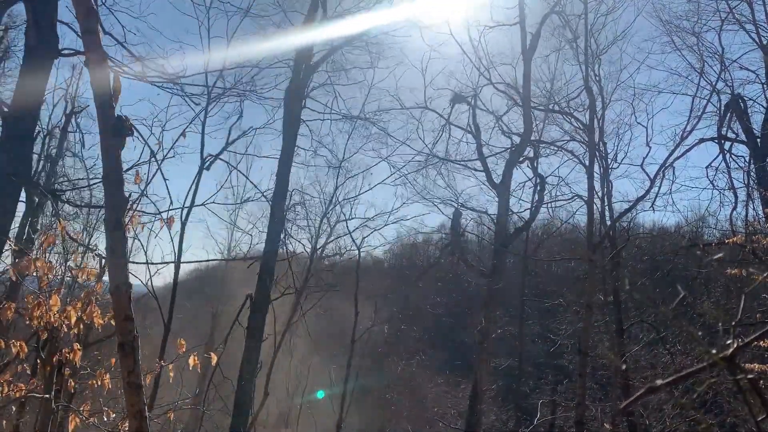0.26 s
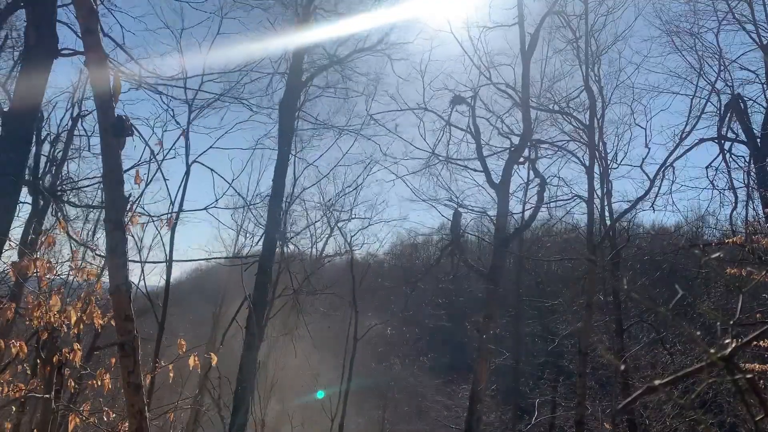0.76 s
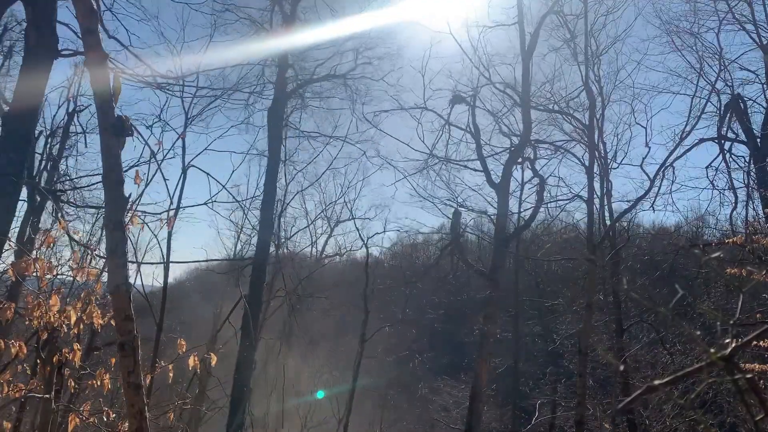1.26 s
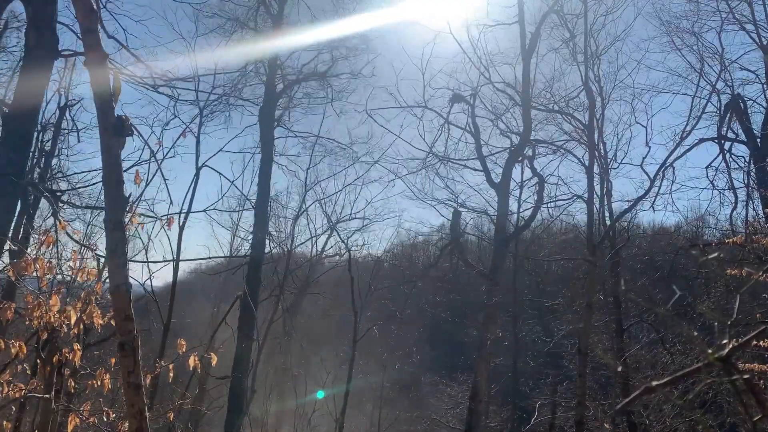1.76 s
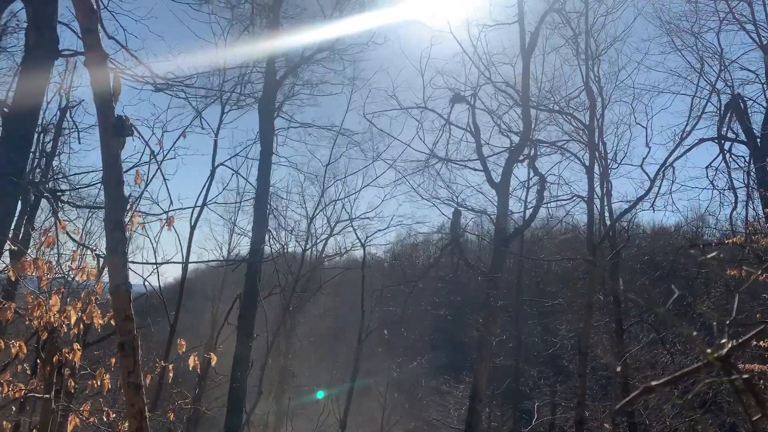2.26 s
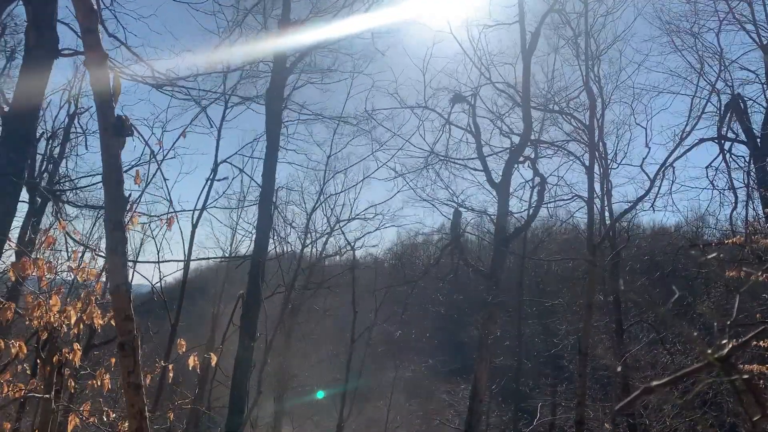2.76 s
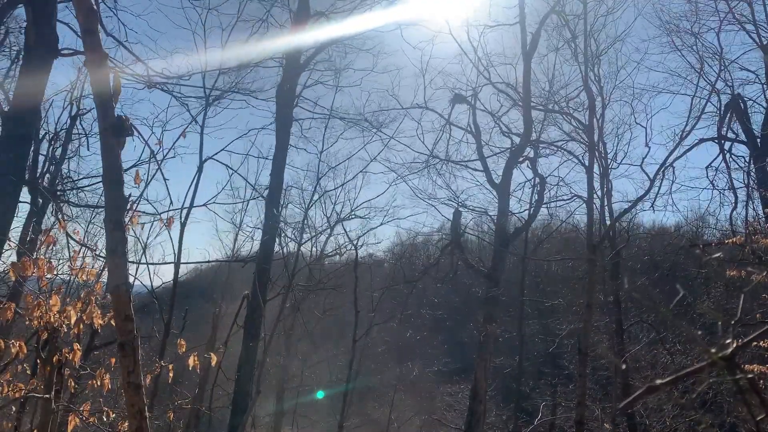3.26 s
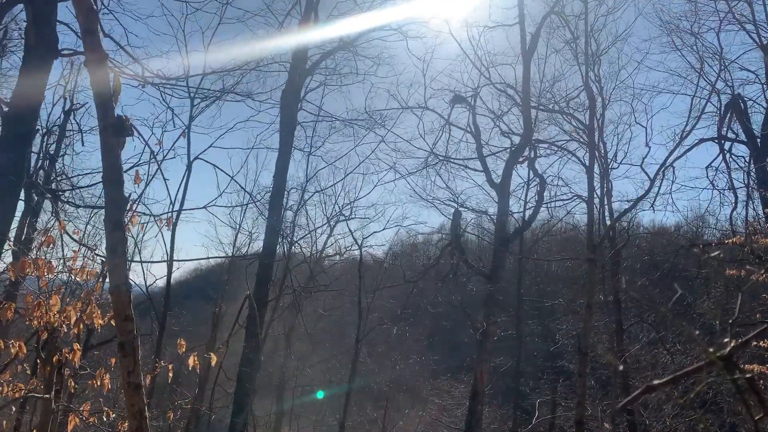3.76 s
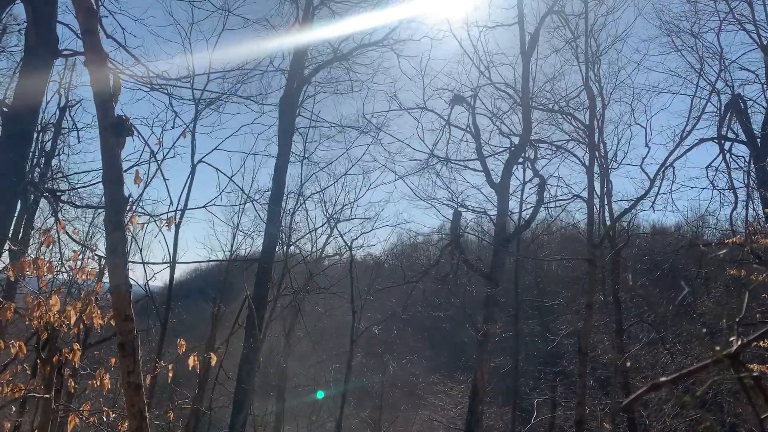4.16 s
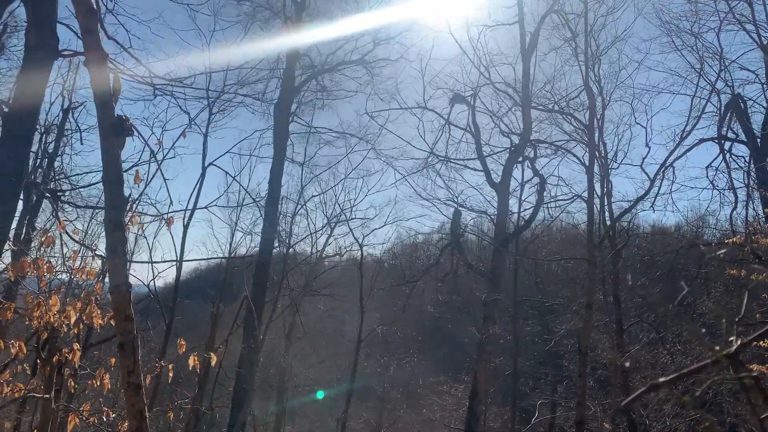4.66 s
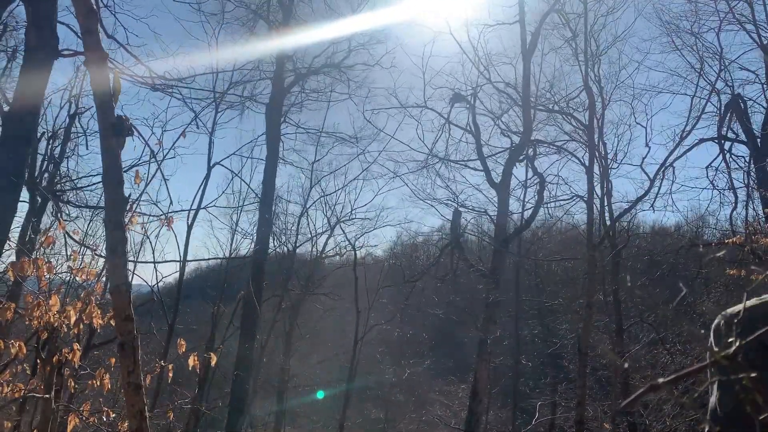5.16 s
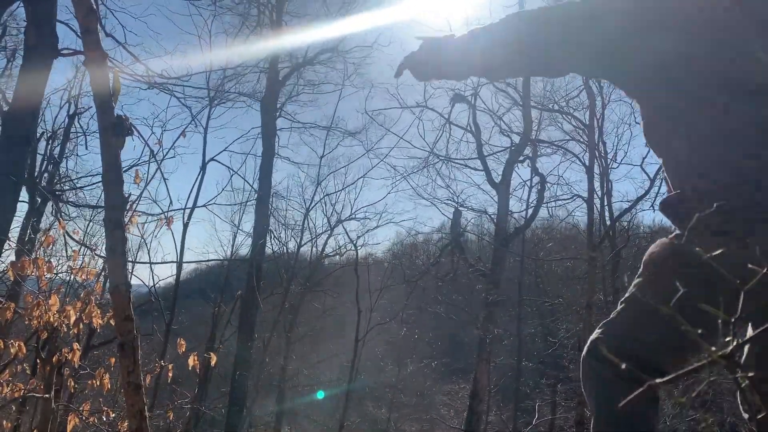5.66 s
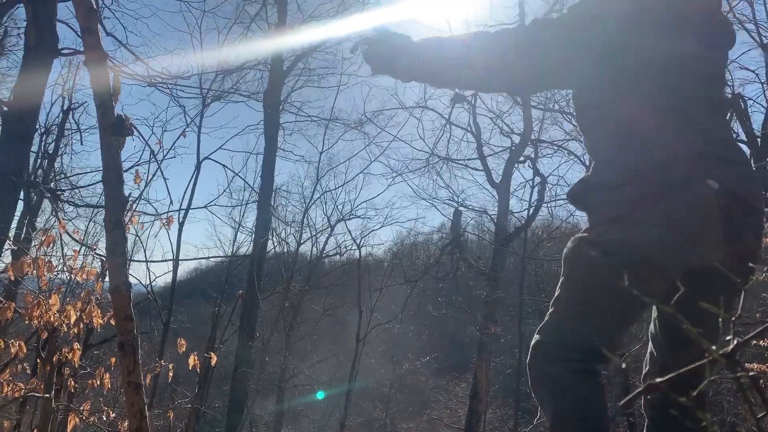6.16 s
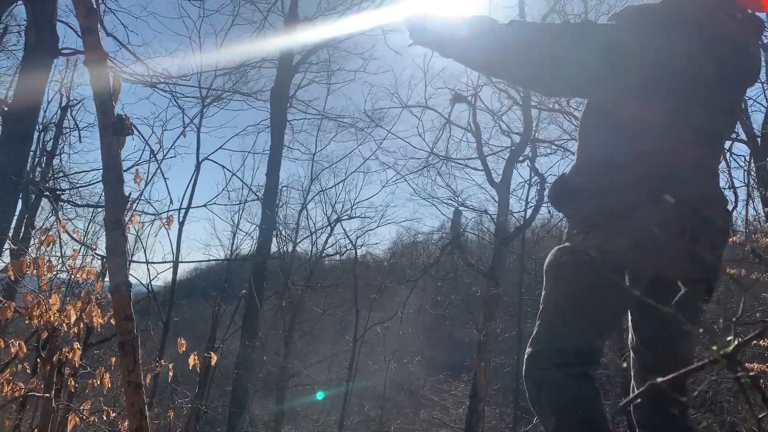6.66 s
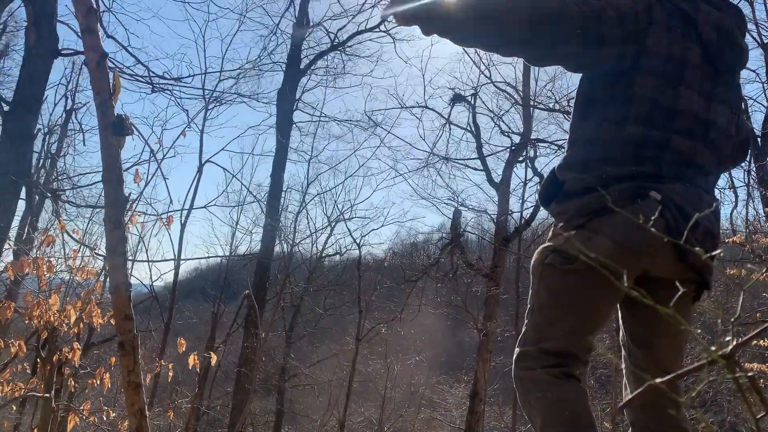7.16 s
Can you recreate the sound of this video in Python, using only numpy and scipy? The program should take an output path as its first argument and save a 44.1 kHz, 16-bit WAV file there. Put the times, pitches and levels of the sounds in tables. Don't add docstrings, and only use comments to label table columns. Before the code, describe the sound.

Branches crack and a trunk lands with deep thumps, twigs rain down, then boots crunch leaves and kick a hollow log as an engine idles.

```python
import sys
import numpy as np
from scipy import signal
from scipy.fft import rfft, irfft, next_fast_len
from scipy.io import wavfile
from scipy.ndimage import uniform_filter1d, map_coordinates

SR = 44100
rng = np.random.default_rng(int(sys.argv[2]) if len(sys.argv) > 2 else 0)


def dump_mix(stems):
    frames = np.atleast_2d(stems).T
    limited = np.clip(frames, -1, 1)
    pcm = np.round(limited * 32767).astype(np.int16)
    wavfile.write(sys.argv[1], SR, pcm)


def field_ratio(decibels):
    return 10 ** (np.asarray(decibels, dtype=float) / 20)


N = 327222
ASIDE = 20.1

# time in seconds, level in dB.
IDLE_LEVEL = [(0.0, -42.5), (0.6, -42), (1.07, -40), (2.44, -39), (4.17, -37.5), (5.37, -35), (6.8, -35),
              (7.42, -35)]
# order, level in dB, polarity.
SHAFT_ORDERS = [(2, -9.5, 0.54), (3, -1, 1), (4, -1, 1), (5, -9, -0.79), (6, -17, -0.89), (7, -14, 0.78)]
# frequency in Hz, density in dB per Hz.
EXHAUST_SPECTRUM = [(25, -25), (45, 1.5), (110, 2), (200, -6.5), (320, -18), (520, -9.5), (900, -21),
                    (1900, -16), (2600, -21), (3500, -32), (8000, -41), (15000, -71.5)]
# frequency in Hz, t60 in seconds.
TREE_DECAY = [(200, 0.34), (2000, 0.26), (10000, 0.016)]

# start in seconds, hold in seconds, level in dB.
SHAKES = [(0.05, 0.072, -39), (0.184, 0.11, -41), (0.401, 0.2, -32.5), (0.713, 0.047, -38),
          (0.853, 0.076, -41.5), (0.993, 0.074, -42.5), (1.213, .06, -46.5), (1.44, 0.0082, -45),
          (3.085, 0.0081, -31), (3.157, 0.07, -32), (3.344, 0.035, -48.5), (3.708, .01, -34.5),
          (3.907, .02, -45), (4.096, 0.31, -45.5)]
# frequency in Hz, width in Hz, level in dB.
SOIL_MODES = [(134, 68, 1.5), (181, 18, -3), (226, 20, -12)]
# start in seconds, peak in dB, frequency in Hz, t60 in seconds.
THUDS = [
    (0.038, -24, 106, 0.07),
    (0.411, -24, 152, 0.069),
    (0.484, -26, 127, 0.056),
    (0.528, -18.5, 127, 0.16),
    (0.564, -19, 131, 0.093),
    (0.961, -31, 180, 0.083),
    (3.082, -35, 101, 0.03),
    (3.175, -22, 140, 0.059),
    (3.198, -29, 182, 0.057),
    (3.219, -20, 110, 0.038),
]

# start in seconds, hold in seconds, leaves in dB, soil in dB.
STRIDES = [(3.155, 0.062, -72, -45), (3.404, 0.31, -39.5, -43.5), (3.892, 0.06, -40, -40),
           (4.116, 0.12, -41, -42.5), (4.348, 0.044, -45, -44.5), (4.561, 0.07, -45.5, -41.5),
           (4.727, 0.061, -48, -45), (4.883, 0.062, -38.5, -40.5), (5.306, 0.018, -49, -44),
           (5.535, 0.04, -47.5, -47), (5.775, 0.073, -53, -57), (5.99, .05, -53, -46.5),
           (6.323, 0.17, -59.5, -55), (6.665, 0.032, -61, -61), (6.844, 0.019, -64.5, -66),
           (7.04, .03, -72, -62), (7.337, .1, -60.5, -48.5)]
# time in seconds, delay at the left port in samples.
PATH = [(4.15, 20), (4.5, 18), (5.7, 17.5), (6.1, 20)]
# time in seconds, share 0-1.
FACING = [(4.0, 0.1), (4.2, 0.6), (5.9, 0.8), (6.2, 0.7)]
# frequency in Hz, gain in dB.
SIDE_SHADE = [(7200, 0), (8600, -2), (9600, -7), (10800, 1)]
# frequency in Hz, density in dB per Hz.
DAMP_SPECTRUM = [(500, -15), (1000, -2), (2000, 4.5), (4200, 5), (5300, 1.5), (7000, 1.5), (9000, 8),
                 (10500, -2.5), (12500, -39)]
# frequency in Hz, density in dB per Hz.
CRISP_SPECTRUM = [(6000, -52), (8500, 9), (10000, 4), (11500, 0), (13500, 4.5), (15500, 4)]
# frequency in Hz, density in dB per Hz.
SCUFF_SPECTRUM = [(120, -32), (250, 1.5), (550, -3.5), (800, -9), (1500, -21)]

# start in seconds, peak in dB, note in Hz, splinters in dB, splinters in Hz.
CRACKS = [(0.116, -19, 1990, -17, 7650), (0.3243, -28, 1570, -20, 6820), (0.3493, -16.5, 1460, -30, 7450),
          (0.3676, -14, 1520, -17, 7180), (0.384, -39, 1650, -18, 4400), (0.392, -24, 1780, -9, 6450),
          (1.548, -27.5, 1290, -9, 3200), (1.835, -27.5, 1900, -11, 4160), (1.856, -32, 1700, -6, 6700),
          (2.944, -51, 1880, 10.5, 6260), (3.095, -31.5, 1690, -12, 3500), (6.585, -37, 1090, -16, 5850)]
# start in seconds, peak in dB, note in Hz,
# splinters in dB, splinters in Hz.
KNOCKS = [
    (0.508, -31, 1480, -18, 7630),
    (0.583, -38, 1010, -14, 8130),
    (0.81, -29.5, 1810, -3, 7290),
    (1.549, -30, 2110, -16, 4050),
    (1.934, -35.5, 1670, -11, 12300),
]
# start in seconds, peak in dB, note in Hz, splinters in dB, splinters in Hz.
SNAPS = [(3.2304, -35.5, 2380, 1.5, 4110), (3.6364, -27, 2840, -26, 4380), (3.8134, -31, 2190, 0.5, 4300),
         (3.8824, -31, 2170, -10, 4330), (3.9265, -21.5, 2200, -5.5, 4040), (4.1814, -35, 2180, 6, 14600),
         (4.1843, -24, 2430, -4, 12700), (4.1866, -18, 3170, -9.5, 7620), (4.3124, -47, 2000, 2, 7380),
         (4.5037, -31.5, 2090, -5.5, 4770), (4.6474, -34, 2150, -3, 4520), (4.7461, -32.5, 2520, -7, 4080)]
# start in seconds, peak in dB, note in Hz, splinters in dB, splinters in Hz.
STEPS = [(3.074, -40, 660, -19, 7510), (3.93, -32.5, 600, -14, 4030), (4.033, -33, 1070, 4, 4080),
         (4.1903, -25, 550, -6, 7630), (5.339, -33, 910, 0, 7510), (5.9168, -24, 1100, -20, 4530),
         (5.92, -41, 1210, -14, 13400), (5.9308, -42, 1000, 1, 12400), (5.939, -40, 900, -1, 9500),
         (6.044, -33, 790, 0, 4360), (6.05, -35.5, 1240, 3, 7370)]
# start in seconds, peak in dB, frequency in Hz.
TICKS = [(5.317, -52, 6950), (5.803, -41, 8600), (5.895, -43, 10000), (5.9159, -22, 9600),
         (5.98, -45, 8280), (6.14, -48, 9000), (6.181, -45, 13800), (6.266, -45, 4640), (6.475, -43, 7070),
         (6.706, -41.5, 6260), (6.63, -53, 9000), (6.919, -57, 8000), (6.94, -54, 7000),
         (7.011, -61, 12000), (7.12, -68, 5850), (7.141, -46, 7720), (7.207, -47, 7000), (7.244, -48, 6630)]
# start in seconds, peak in dB, note in Hz,
# splinters in dB, splinters in Hz.
HOLLOWS = [
    (1.3615, -31, 516, -22, 7610),
    (1.372, -38, 310, -25, 5000),
    (3.152, -47, 484, -20, 5000),
    (5.937, -37, 450, -20, 6820),
    (6.05, -36, 445, -17, 7370),
]
# start in seconds, shell in dB, hollow in dB.
KICKS = [
    (5.3902, -17.5, -48),
    (5.4001, -8, -12.5),
]

# time in seconds, level in dB.
DEBRIS_LEVEL = [(0.0, -35.5), (0.8, -37.5), (1.05, -41.5), (1.6, -45), (2.3, -51.5), (2.95, -52),
                (3.28, -46), (3.6, -57), (4.4, -120)]
# start in seconds, hold in seconds, level in dB.
SHOWERS = [
    (0.135, .04, -49),
    (0.84, 0.071, -45),
    (1.01, 0.11, -51),
    (1.184, 0.077, -48.5),
    (1.58, .015, -50.5),
    (2.41, 0.025, -57.5),
]
# frequency in Hz, density in dB per Hz.
BOUGH_SPECTRUM = [(150, 3), (300, -3), (600, 2.5), (1000, 0), (1600, 0.5), (2500, -8), (4000, -10.5),
                  (7000, -9.5)]
# frequency in Hz, density in dB per Hz.
TWIG_SPECTRUM = [(800, -20), (2000, 2.5), (5000, -1.5), (8200, 4.5), (10400, 5.5), (11600, -4.5),
                 (13500, -4), (15600, -7.5)]

# frequency in Hz, lead of the left treble in radians.
STEER = [(5000, 1), (6400, .6), (7700, 1.75), (9100, 3), (10250, 3.3), (12500, 6.1), (13850, 6.45),
         (16000, 9)]
# frequency in Hz, weight of the right sound beside the left one's 1.
LEAK = [(8700, .55), (9150, .05), (10250, .05), (10700, .7), (11900, .6), (12500, .05), (13800, .05),
        (14400, .55)]


def unit(x):
    return x / np.sqrt(np.mean(x ** 2) + 1e-20)


def along(points, hz):
    f, v = np.transpose(points)
    return np.interp(np.log(hz + 1), np.log(f + 1), v)


def curves(rows):
    s, *cols = np.transpose(rows)
    return [np.interp(np.arange(N) / SR, s, c) for c in cols]


def wobble(rate):
    knots = rng.standard_normal(int(N * rate / SR) + 4)
    return map_coordinates(knots, [np.arange(N) * rate / SR])


def swells(s, hold_s, db, rise, fall):
    t = np.arange(0, N + 64, 64)[:, None] / SR
    shape_db = db - rise * np.maximum(s - t, 0) - fall * np.maximum(t - s - hold_s, 0)
    level_db = 10 * np.log10(np.sum(field_ratio(shape_db) ** 2, axis=1) + 1e-14)
    return np.interp(np.arange(N) / SR, t[:, 0], level_db)


def filtered(x, response):
    m = next_fast_len(N + SR // 2)
    return irfft(rfft(x, m) * response(np.fft.rfftfreq(m, 1 / SR)), m)[..., :N]


def crackle(spectrum, grain_db, patchy_db, scattered, lag):
    grains = np.minimum(rng.exponential(size=N // 40 + 1), 4)
    size = field_ratio(grain_db * np.repeat(grains, 40)[:N])
    z = signal.stft(size * rng.standard_normal((3, N)), nperseg=512)[2]
    patches = uniform_filter1d(rng.standard_normal(z.shape[1:]), size=4, axis=0)
    patches = uniform_filter1d(patches, size=5, axis=1)
    noise = signal.istft(z * field_ratio(patchy_db * unit(patches)), nperseg=512)[1][:, :N]
    direct, left, right = filtered(noise, lambda hz: field_ratio(along(spectrum, hz)))
    late = direct[np.clip(np.arange(N) - np.round(lag).astype(int), 0, N - 1)]
    return unit(np.array([late + scattered * left, direct + scattered * right]))


def add(track, s, sound):
    part = track[..., round(s * SR):][..., :sound.shape[-1]]
    part += sound[..., :part.shape[-1]]


def engine():
    level_db, = curves(IDLE_LEVEL)
    turns_hz = 21.1
    turn = 0.9 + 2 * np.pi * turns_hz * np.arange(N) / SR + 0.15 * wobble(2)
    lean = np.array([[-0.08], [0.08]])
    hum = 0
    for order, db, sign in SHAFT_ORDERS:
        strength = sign * field_ratio(db + 0.66 * wobble(9))
        phase = order * turn - 0.35 + 0.32 * wobble(8) + lean * wobble(2.31) + lean
        hum = hum + strength * np.cos(phase)
    puff = 1 + 0.18 * np.cos(turn + 1.77)
    exhaust = puff * crackle(EXHAUST_SPECTRUM, grain_db=0.5, patchy_db=2.5, scattered=0.5, lag=ASIDE)
    return field_ratio(level_db) * (field_ratio(3.0) * hum + field_ratio(-4.5) * exhaust)


def forest(x):
    hz, t, z = signal.stft(rng.standard_normal((2, SR // 2)), SR, nperseg=256)
    decay = field_ratio(-60 * t / along(TREE_DECAY, hz)[:, None])
    tail = signal.istft(z * decay, SR, nperseg=256)[1]
    return signal.fftconvolve(x, tail / np.linalg.norm(tail[0]), axes=1)[:, :N]


def soil_response(f):
    return sum(field_ratio(db) * 1j * f * w / (c * c - f * f + 1j * f * w) for c, w, db in SOIL_MODES) ** 2


def ground():
    level = field_ratio(swells(*np.transpose(SHAKES), rise=280, fall=310))
    out = field_ratio(-0.5) * level * unit(filtered(rng.standard_normal(N), soil_response))
    t = np.arange(SR // 4) / SR
    for s, db, hz, t60 in THUDS:
        envelope = field_ratio(db + 7.5 - 60 * t / t60) * (1 - np.exp(-t / 0.0054))
        add(out, s, -envelope * np.sin(2 * np.pi * hz * t))
    return out


def wading():
    s, hold_s, leaves_db, soil_db = np.transpose(STRIDES)
    damp_db = swells(s, hold_s, leaves_db, rise=98, fall=71)
    scuff_db = swells(s, hold_s, soil_db, rise=103, fall=53)
    crisp_db = -39 + 1.34 * (damp_db - leaves_db[1])
    crisp = crackle(CRISP_SPECTRUM, grain_db=2.0, patchy_db=2.5, scattered=0.32, lag=ASIDE)
    damp = crackle(DAMP_SPECTRUM, grain_db=1.6, patchy_db=1.5, scattered=0.6, lag=curves(PATH)[0])
    scuff = crackle(SCUFF_SPECTRUM, grain_db=2.5, patchy_db=2.5, scattered=1.0, lag=ASIDE)
    leaves = field_ratio(crisp_db + 6.0) * crisp + field_ratio(damp_db + 6.5) * damp
    facing = np.clip(curves(FACING)[0], 0, 1)
    shaded = filtered(leaves, lambda hz: field_ratio(along(SIDE_SHADE, hz)))
    return facing * leaves + (1 - facing) * shaded + field_ratio(scuff_db - 1.5) * scuff


def breaks(events, cycles, spit_s, body, body_hz, lag, pan_db):
    out, t = np.zeros((2, N)), np.arange(SR // 25) / SR
    noise = rng.standard_normal((len(events), len(t)))
    for (s, db, hz, spit_db, spit_hz), white in zip(events, noise):
        age = t * hz / cycles
        note = np.sin(2 * np.pi * hz * t) * age * np.exp(1 - age)
        slow = age * body_hz / hz
        note = note + body * np.sin(2 * np.pi * body_hz * t) * slow * np.exp(1 - slow)
        spit = signal.lfilter(*signal.iirpeak(spit_hz, 1.1, SR), white) + 0.1 * np.diff(white, prepend=0)
        sound = field_ratio(db + 1.5) * note + field_ratio(db + spit_db + 9.5 - 60 * t / spit_s) * spit
        add(out[0], s + 0.0008 + lag / SR, field_ratio(pan_db / 2) * sound)
        add(out[1], s + 0.0008, field_ratio(-pan_db / 2) * sound)
    return out


def hollow_log():
    out, t = np.zeros((2, N)), np.arange(SR // 8) / SR
    for s, shell_db, hollow_db in KICKS:
        cycles = 380 * t + 0.65 * (1 - np.exp(-t / 0.00065))
        shell_level = (1 - np.exp(-t / 0.0006)) * field_ratio(shell_db - 60 * t / 0.03)
        shell = -np.sin(2 * np.pi * cycles) * shell_level
        toe = np.sin(2 * np.pi * 1200 * t) * field_ratio(shell_db - 7 - 60 * t / 0.005)
        boom_level = (1 - np.exp(-(t / 0.005) ** 6)) * field_ratio(hollow_db + 6.0 - 60 * t / 0.1)
        boom = np.cos(2 * np.pi * 97 * (t - 0.009)) * boom_level
        add(out[0], s, shell + boom)
        add(out[1], s + 0.00038, shell)
        add(out[1], s + 0.0011, boom)
        add(out[1], s - 0.0002, toe)
    return out


def felled_tree():
    boughs_db, = curves(DEBRIS_LEVEL)
    steady = field_ratio(-44 + 0.69 * (boughs_db - DEBRIS_LEVEL[0][1]))
    showers = field_ratio(swells(*np.transpose(SHOWERS), rise=180, fall=88))
    boughs = crackle(BOUGH_SPECTRUM, grain_db=2.2, patchy_db=1.8, scattered=0.7, lag=-2)
    twigs = crackle(TWIG_SPECTRUM, grain_db=1.7, patchy_db=2.0, scattered=2.9, lag=-3.5)
    return field_ratio(boughs_db + 1.5) * boughs + np.hypot(steady, showers) * field_ratio(9.5) * twigs


def scene():
    far = breaks(CRACKS, cycles=0.45, spit_s=0.0073, body=0.37, body_hz=610, lag=0, pan_db=0.7)
    far = far + breaks(KNOCKS, cycles=2.2, spit_s=0.009, body=0.11, body_hz=600, lag=0, pan_db=3.0)
    right = breaks(SNAPS, cycles=1.16, spit_s=0.021, body=0.21, body_hz=514, lag=ASIDE, pan_db=0.6)
    sticks = list(STEPS) + [(s, db - 14, 750, 14, hz) for s, db, hz in TICKS]
    front = breaks(sticks, cycles=0.69, spit_s=0.0064, body=0.3, body_hz=387, lag=0, pan_db=2.0)
    front = front + breaks(HOLLOWS, cycles=1.6, spit_s=0.011, body=0.15, body_hz=640, lag=0, pan_db=-4.0)
    echoes = forest(field_ratio(-7) * far + field_ratio(-5) * right + field_ratio(-13) * front)
    return engine() + echoes + ground() + wading() + far + right + front + hollow_log() + felled_tree()


def top_cut(x):
    return signal.sosfilt(signal.butter(12, 16510, fs=SR, output="sos"), x)


def record(dry):
    def low(hz):
        return 1 / (1 + (hz / 5600) ** 8)

    def steered(hz):
        turn = np.exp(0.5j * along(STEER, hz) * np.array([[1], [-1]]))
        return (1 - low(hz)) * turn * (hz < 15850)

    own = filtered(dry[0], lambda hz: 1 / np.hypot(1, along(LEAK, hz)))
    other = filtered(dry[1], lambda hz: along(LEAK, hz) / np.hypot(1, along(LEAK, hz)))
    treble = filtered(np.array([dry[0], own + other]), steered)
    return top_cut(filtered(dry, low) + treble)


dry = scene()
out = record(dry)
dump_mix(out)
```